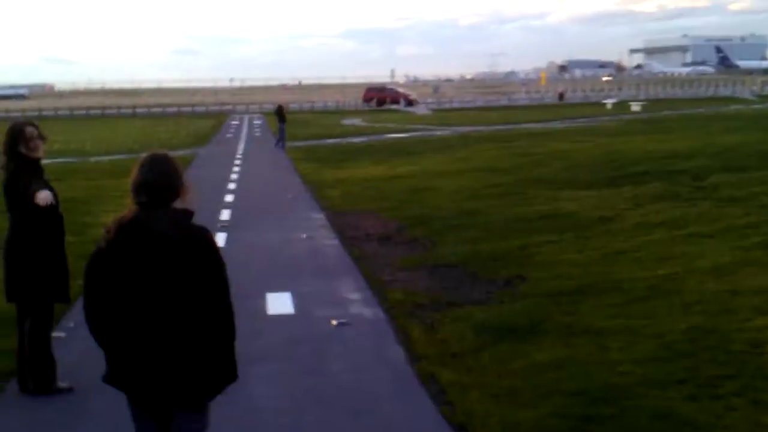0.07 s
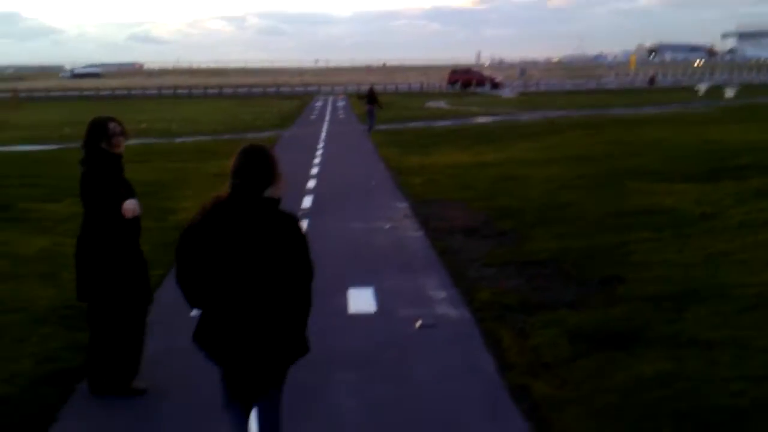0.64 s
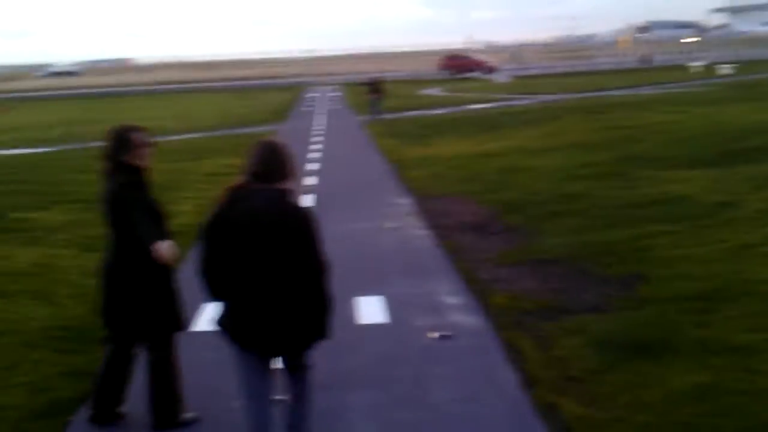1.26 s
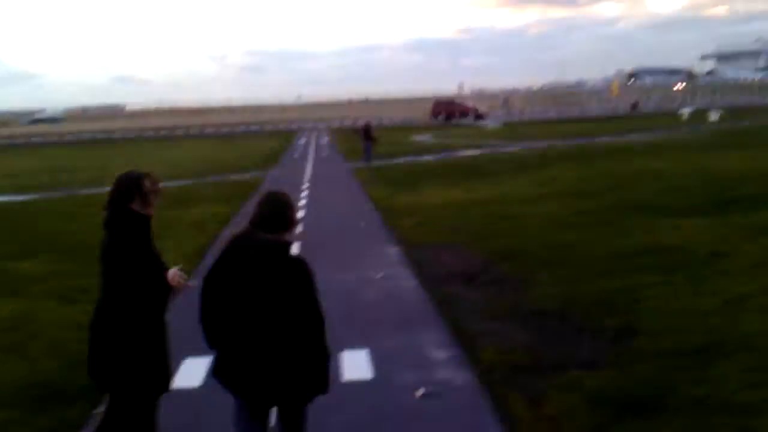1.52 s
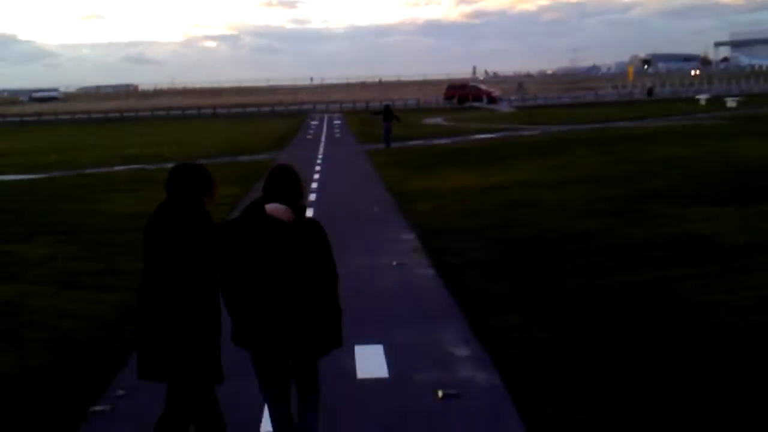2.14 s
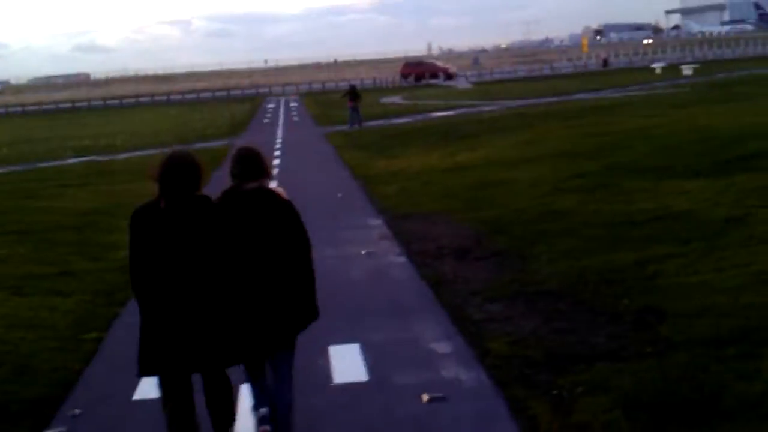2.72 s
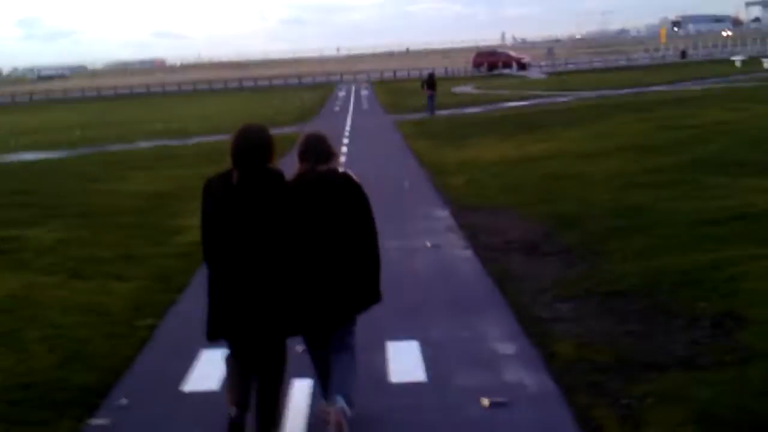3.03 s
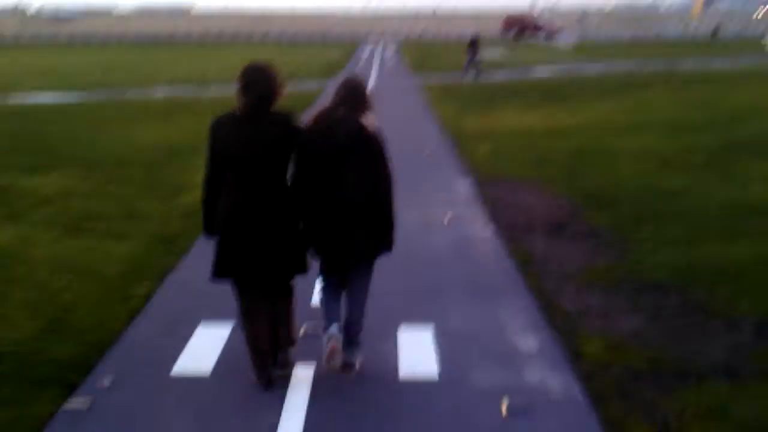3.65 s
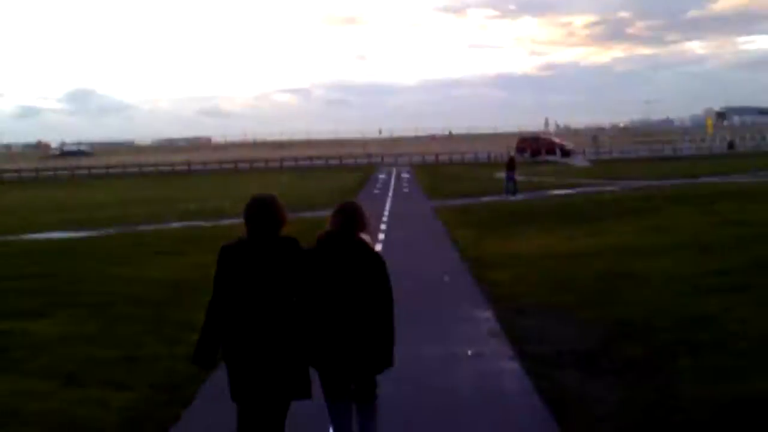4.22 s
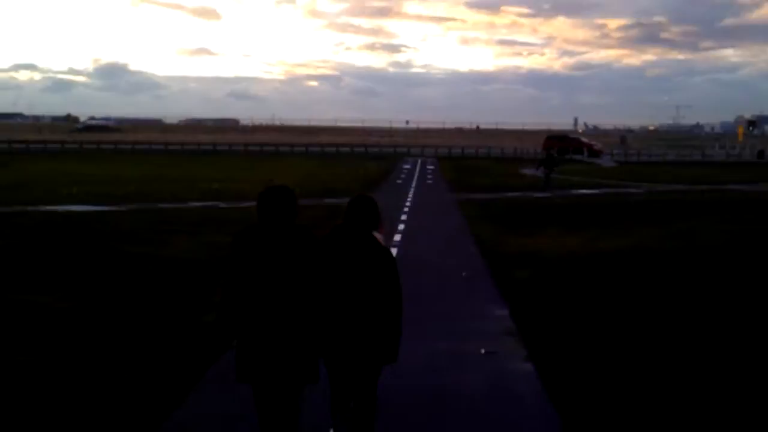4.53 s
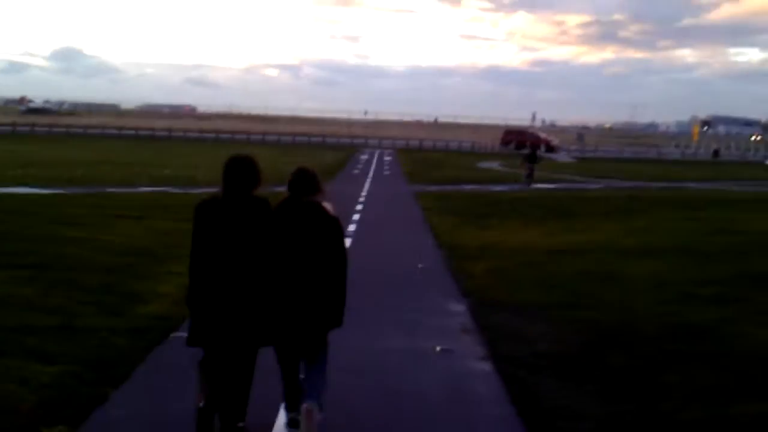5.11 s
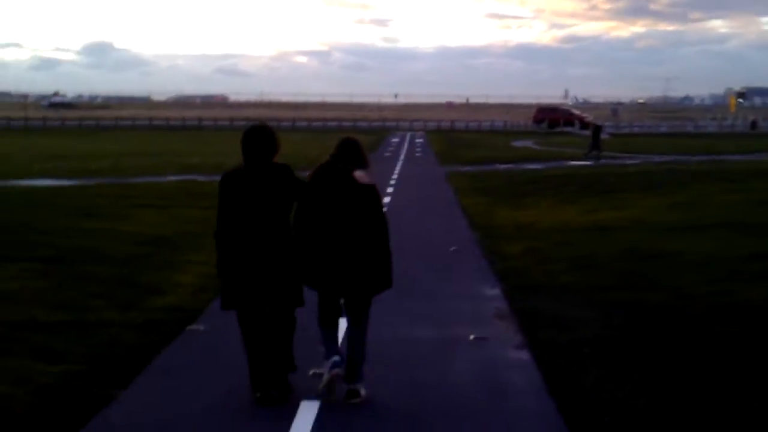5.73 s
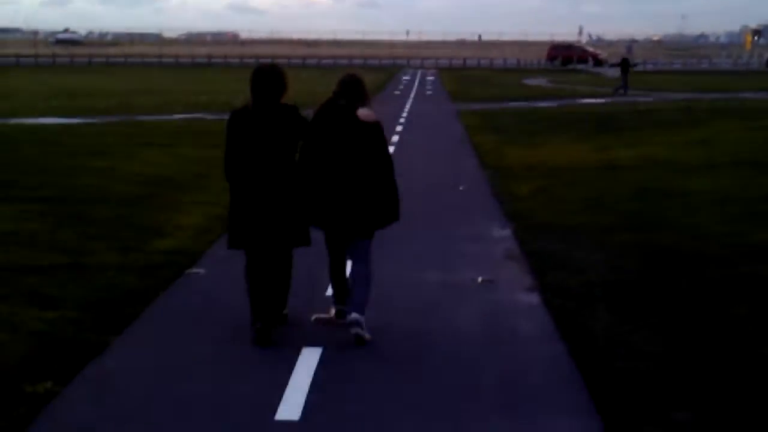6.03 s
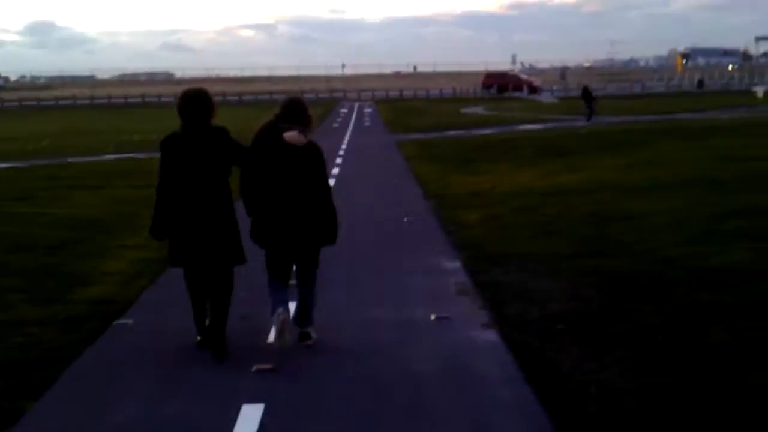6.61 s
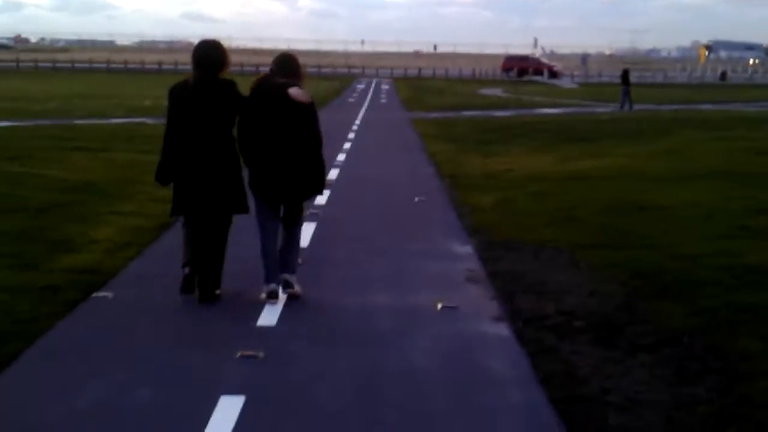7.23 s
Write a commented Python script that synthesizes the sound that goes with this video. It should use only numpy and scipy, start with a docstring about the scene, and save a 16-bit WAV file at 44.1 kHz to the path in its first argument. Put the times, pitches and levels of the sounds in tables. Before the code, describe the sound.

Outdoors near an airfield, a propeller plane flies over with a low drone and a rushing roar. After a brief high whine the sound swells, then slowly recedes, the drone falling in pitch and wavering while the roar keeps returning in short surges. Walkers' shoes tick and scuff faintly on a paved path. A small microphone with dull treble adds a soft hiss over the low outdoor background.

```python
"""A turboprop airliner passes overhead beside an airfield. Its propeller blades beat the air into a deep
drone that sinks in pitch, its engine roar surges with the turbulent air, and its turbine whines briefly.
Drone and roar also bounce off the ground; this echo cancels some pitches and boosts others, in a slow
sweep. Below lie outdoor noise, microphone hiss and the faint ticks, knocks and scuffs of people walking."""
import sys
import numpy as np
from scipy import signal
from scipy.io import wavfile

SR = 44100
rng = np.random.default_rng(int(sys.argv[2]) if len(sys.argv) > 2 else 0)


def generate_wav(signal):
    """Clip the signal to [-1, 1] and save it as 16-bit WAV at the path in sys.argv[1]."""
    frames = np.transpose(np.atleast_2d(signal))
    scaled = np.clip(frames, -1, 1) * 32767
    pcm = np.round(scaled).astype(np.int16)
    wavfile.write(sys.argv[1], SR, pcm)


N = 329074

# The background, from low outdoor noise up to microphone hiss: pitch_hz, relative_db
BACKGROUND_SPECTRUM = [(25, -8), (45, 1.5), (150, 2), (300, .5), (450, -7), (700, -1.5), (1000, -3.5),
                       (1550, -2.5), (1950, -5), (2450, -11.5), (3080, -18.5), (3880, -18.5), (4900, -27.5),
                       (6150, -31)]
# Shoes and clothes tick: start_s, level_db
SHOE_TICKS = [(0.1966, -43), (0.409, -33), (0.894, -32), (0.9247, -32), (0.9773, -34), (1.3803, -35.5),
              (1.84, -33.5), (2.9, -33), (2.9116, -34), (4.0795, -40), (4.252, -37), (4.4403, -36),
              (4.5886, -41), (5.4205, -31.5), (6.4259, -38), (6.47, -40), (7.124, -36), (7.319, -33)]
# Heels land on asphalt with a dull knock: start_s, level_db
HEEL_KNOCKS = [(0.884, -22.5), (2.911, -27)]
# Soles and coats rub: middle_s, level_db, half_length_s
SOLE_SCUFFS = [(.22, -56, .09), (.447, -49, .07), (.59, -49, .04), (.95, -50, .06), (2.035, -60, 0.0295),
               (2.39, -57, .05), (2.917, -45, 0.016), (2.968, -45, 0.032), (5.46, -56, .05),
               (6.41, -53.5, 0.078), (6.93, -53, .025)]

# Turbulent air carries the engine noise over in surges: peak_s, boost_db, rise_s, pitch_hz, spread_octaves
AIR_SURGES = [(0.26, 5.5, 0.052, 1794, 2.3), (0.58, 7.5, 0.059, 850, 1), (1.057, 4.5, 0.13, 1297, 1.4),
              (1.316, 8.5, 0.067, 2970, 1.4), (1.675, 6, 0.1, 2380, 1.8), (2.026, 4, 0.03, 3020, 0.43),
              (2.204, 4, 0.065, 1410, 1.4), (2.45, 6, 0.042, 3000, 1.1), (3.026, 10.5, .115, 1055, 1.7),
              (3.97, 8, 0.048, 1655, 1.2), (4.133, 4, 0.061, 1625, 1.2), (4.705, 7, 0.095, 1707, 1.17),
              (4.69, 5, 0.034, 700.3, 0.6), (5.46, 9.5, 0.09, 1296, 1.3), (6.417, 10, 0.1, 916, 1.05),
              (6.469, 10, 0.13, 181, 0.85), (6.915, 10.5, 0.12, 750, 0.66), (7.404, 12, 0.11, 606, 1.1)]
# The ground echo comes latest with the aircraft overhead: time_s, delay_ms
ECHO_DELAY = [(0, 7.27), (1, 8.32), (2, 8.62), (3, 8.6), (3.5, 8.38), (4.65, 8.42), (5, 7.98), (6, 7.25),
              (6.6, 6.84), (7.46, 6.08)]
# The turbine whine beams forward and arrives in swells: middle_s, relative_db, half_length_s
TURBINE_SWELLS = [(.95, -45.5, 0.11), (1.09, -38, 0.076), (1.33, -32.5, .05), (1.56, -42.5, .08),
                  (1.685, -36.5, 0.045), (1.82, -41, .09)]
# How strong the roar is from low to high: pitch_hz, relative_db
ROAR_SPECTRUM = [(25, -14.5), (40, -14), (70, -2.5), (130, -4.5), (220, -6), (370, -1.5), (620, -2),
                 (1000, -6), (1900, -11), (2450, -14.5), (3080, -19), (3880, -24), (4900, -34),
                 (6150, -54.5)]
# The roar's low part, the exhaust rumble: time_s, relative_db
ROAR_LOW = [(0, 2), (2.1, 4.5), (2.9, 1.5), (3.5, -2), (5.1, 0.5), (5.7, -2.5), (6.15, -8), (6.7, -2.5),
            (7.46, -5.5)]
# Its middle part, loudest overhead: time_s, relative_db
ROAR_MIDDLE = [(0, -3.5), (1.45, -1), (1.95, 8.5), (2.7, 2.5), (3.45, -1.5), (3.7, 5), (4.4, -1.5),
               (4.95, 2), (6.1, -3.5), (7.2, -16)]
# Its high part, a hiss that beams forward: time_s, relative_db
ROAR_HIGH = [(0, -1), (1.5, -3.5), (2.38, -4), (2.65, -7), (3.6, -6.5), (4.2, -4), (5.8, -3.5),
             (7.46, -4.5)]

# The rate of blade pulses, sinking as the aircraft flies by: time_s, pitch_hz
BLADE_PITCH = [(0, 105.3), (1, 100.2), (2, 96.7), (3.2, 92.8), (4, 90.66), (4.65, 88.85), (5, 88.2),
               (6, 86.43), (6.6, 85.5), (7.46, 84.6)]
# The drone's lowest tone, before waver and throb: time_s, level_db
DRONE_LEVEL = [(0, -15), (.33, -17), (.62, -16), (1.35, -18.5), (1.92, -14.5), (2.3, -18), (2.85, -16),
               (3.2, -19.5), (3.85, -17.5), (4.55, -18.5), (4.8, -21), (5.25, -18), (5.72, -30.5),
               (5.92, -25), (6.5, -29.5), (7.46, -40.5)]
# That tone wavers more as the aircraft moves away: time_s, waver_db
DRONE_UNSTEADINESS = [(0, 0.1), (5.1, .7), (5.8, 1.9), (7.46, 1.5)]
# Overtones (higher tones of the drone) that beam sideways, loudest overhead: time_s, level_db
SIDE_BEAM = [(0, -30), (.25, -34), (.5, -24), (.7, -30), (.86, -24.5), (1.35, -30), (1.9, -23.5),
             (2.45, -29), (2.9, -25.5), (3.35, -32), (3.9, -33), (4.4, -42.5), (5.2, -35.5), (6.15, -43.5),
             (6.47, -30.5), (6.7, -40), (7.46, -42)]
# The tones in that beam: pitch_multiple, offset_db
SIDE_OVERTONES = [(2, 1.5), (5, -18), (6, -19), (7, -21.5)]
# Overtones that beam backwards, loudest just after the aircraft has passed: time_s, level_db
REAR_BEAM = [(0, -36.5), (1, -36), (1.45, -44), (2, -37), (2.7, -44.5), (3.2, -35), (4.05, -35.5),
             (4.42, -44), (4.62, -35.5), (4.8, -41.5), (5.5, -36), (6.1, -45.5), (7.46, -44)]
# The tones in that beam: pitch_multiple, offset_db
REAR_OVERTONES = [(3, 0.024), (4, -1.2)]


def from_db(db):
    """Turn decibels into a number to multiply a sound by."""
    return 10 ** (np.asarray(db) / 20)


def rms_one(x):
    """Scale a signal so that its average strength (rms) is 1."""
    return x / np.sqrt(np.mean(x ** 2) + 1e-20)


def curve(rows):
    """Join (time_s, value) points with straight lines, giving a value for every sample."""
    times_s, values = np.transpose(rows)
    return np.interp(np.arange(N) / SR, times_s, values)


def drift(rate_hz):
    """A smooth random wobble of about size 1; a higher rate makes it quicker."""
    step, warm_up = 40, 2000   # one point every 40 samples; the first 2000 points are dropped
    memory = np.exp(-2 * np.pi * step * rate_hz / SR)
    noise = rng.standard_normal(N // step + warm_up + 2)
    smooth = signal.lfilter([1], [1, -2 * memory, memory * memory], noise)[warm_up:]
    return np.interp(np.arange(N) / step, np.arange(len(smooth)), rms_one(smooth))


def swells(rows):
    """A loudness shape with one smooth hump for each (middle_s, level_db, half_length_s)."""
    t = np.arange(N) / SR
    return sum(from_db(db) * np.exp(-np.minimum(((t - s) / half) ** 2, 20)) for s, db, half in rows)


def band_noise(low_hz, high_hz, order):
    """Noise between two pitches; a higher order gives sharper edges."""
    band = signal.butter(order, [low_hz, high_hz], "band", fs=SR, output="sos")
    return signal.sosfilt(band, rng.standard_normal(N))


def noise_bands(spectrum):
    """Noise in third-octave slices, as (centre_hz, band) pairs; together they have strength 1."""
    edges = np.geomspace(22, 6900, 26)
    centres = np.sqrt(edges[:-1] * edges[1:])
    white = rng.standard_normal((2, N))   # neighbouring bands get unrelated noise
    filters = [signal.butter(3, pair, "band", fs=SR, output="sos") for pair in zip(edges, edges[1:])]
    bands = np.array([signal.sosfilt(sos, white[k % 2]) for k, sos in enumerate(filters)])
    pitch_hz, relative_db = np.transpose(spectrum)
    bands *= from_db(np.interp(np.log(centres), np.log(pitch_hz), relative_db))[:, None]
    return zip(centres, bands / np.std(bands.sum(axis=0)))


def outdoor_noise_and_hiss(level_db, flutter_db, steady_above_hz):
    """Wavering low outdoor noise, with a steadier microphone hiss above it that sinks a little."""
    sink_db = 0.05 * (np.arange(N) - N / 2) / SR
    out = np.zeros(N)
    for hz, band in noise_bands(BACKGROUND_SPECTRUM):
        restless = 1 / (1 + (hz / steady_above_hz) ** 2)
        out += band * from_db(restless * flutter_db * drift(4.9) - (1 - restless) * sink_db)
    return from_db(level_db) * out


def taps(rows, fade_s, low_hz, high_hz, order):
    """Small hits of shoes and clothes: noise that starts at once and falls 60 dB in fade_s."""
    tail = from_db(-60 * np.arange(SR // 4) / SR / fade_s)
    loudness = np.zeros(N + SR)
    for start_s, level_db in rows:
        start = round(start_s * SR)
        loudness[start:start + len(tail)] += from_db(level_db) * tail
    return loudness[:N] * rms_one(band_noise(low_hz, high_hz, order))


def scuffs(grain_db):
    """Soles and cloth rub, making short swells of grainy hiss."""
    grit = band_noise(2000, 8000, order=1) * from_db(grain_db * drift(120))
    return swells(SOLE_SCUFFS) * rms_one(grit)


def air_surges():
    """Turbulent air lifts the sound for a moment: (pitch_hz, spread_octaves, boost_db over time) each."""
    t = np.arange(N) / SR
    surges = []
    for peak_s, boost_db, rise_s, pitch_hz, octaves in AIR_SURGES:
        fall_s = 1.16 * rise_s
        from_peak = np.abs(t - peak_s) / np.where(t < peak_s, rise_s, fall_s)
        hump = np.exp(-np.minimum(from_peak, 3) ** 2.1)   # a power above 2 flattens the top
        surges.append((pitch_hz, octaves, boost_db * hump))
    return surges


def surge_db(surges, hz):
    """How far the surges lift one pitch: most at their centre, less with every octave away."""
    return sum(boost * np.exp(-.5 * (np.log2(hz / centre) / octaves) ** 2)
               for centre, octaves, boost in surges)


def scattered(phase, width_hz):
    """Turbulence smears a tone into a narrow band of noise around its pitch."""
    return drift(width_hz) * np.sin(phase) + drift(width_hz) * np.cos(phase)


def add_ground_echo(direct, strength, dull_hz):
    """The direct sound plus its slightly later bounce off the ground, which is duller in the treble."""
    dulled = signal.sosfilt(signal.butter(1, dull_hz, fs=SR, output="sos"), direct)
    n = np.arange(N)
    delay_samples = curve(ECHO_DELAY) * SR / 1000
    return direct + strength * np.interp(n - delay_samples, n, dulled, left=0)


def compressor_rasp(surges, low_hz, high_hz, nearest_s, fade_db_per_s):
    """Rough noise from the engine's compressor, which only carries while the aircraft is near."""
    rough = band_noise(low_hz, high_hz, order=2) * from_db(2.5 * drift(40))
    level_db = -43 - fade_db_per_s * np.abs(np.arange(N) / SR - nearest_s)
    return from_db(level_db + surge_db(surges, np.sqrt(low_hz * high_hz))) * rms_one(rough)


def turbine_whine(pitch_hz, wobble_hz, tone_gain_db, smear_gain_db):
    """The compressor's high tone; turbulence scatters part of it into noise."""
    phase = 2 * np.pi * np.cumsum(pitch_hz + wobble_hz * drift(40)) / SR
    tone = np.sqrt(2) * from_db(2.0 * drift(30)) * np.sin(phase)
    smear = scattered(phase, width_hz=230)
    return swells(TURBINE_SWELLS) * (from_db(tone_gain_db) * tone + from_db(smear_gain_db) * smear)


def engine_roar(surges, gain_db, flutter_db):
    """Exhaust and air rushing over the aircraft: noise that swells with the pass and the surges."""
    levels_db = np.array([curve(ROAR_LOW), curve(ROAR_MIDDLE), curve(ROAR_HIGH)])
    parts_hz = [252, 600, 2900]   # where each of the three levels holds; between them they blend
    out = np.zeros(N)
    for hz, band in noise_bands(ROAR_SPECTRUM):
        shares = np.array([np.interp(np.log(hz), np.log(parts_hz), part) for part in np.eye(3)])
        out += from_db(shares @ levels_db + surge_db(surges, hz) + flutter_db * drift(14)) * band
    return from_db(gain_db) * out


def throb_db(start_s, grow_s, crest_s, period_s, swing_db):
    """The slow beat of the far-off drone, which dips further than it rises."""
    t = np.arange(N) / SR
    grown = np.clip((t - start_s) / grow_s, 0, 1)
    return swing_db * grown * (np.cos(2 * np.pi * (t - crest_s) / period_s) - .5)


def propeller(blade_hz, smear_hz):
    """Each passing blade sends a pulse of air. The lowest tone stays clean; distance blurs the rest."""
    phase = 2 * np.pi * np.cumsum(blade_hz) / SR
    level_db = curve(DRONE_LEVEL) + curve(DRONE_UNSTEADINESS) * drift(6.8)
    level_db += throb_db(start_s=6.53, grow_s=0.37, crest_s=6.79, period_s=0.53, swing_db=26)
    out = np.sqrt(2) * from_db(level_db) * np.sin(phase)
    blur = 0.014 + 0.041 * np.arange(N) / SR   # grows as the aircraft moves away
    for beam, overtones in ((SIDE_BEAM, SIDE_OVERTONES), (REAR_BEAM, REAR_OVERTONES)):
        for multiple, offset_db in overtones:
            noise_share = np.clip(blur * multiple / 2, 0, 1)   # high overtones turn to noise first
            smear = np.sqrt(noise_share) * scattered(multiple * phase, multiple * smear_hz)
            tone = np.sqrt(2 * (1 - noise_share)) * np.sin(multiple * phase + rng.uniform(0, 2 * np.pi))
            out += from_db(curve(beam) + offset_db) * (tone + smear)
    return out


def scene():
    """The aircraft heard over the ground, with the background and the walkers, in one channel."""
    blade_hz = curve(BLADE_PITCH)
    surges = air_surges()
    drone = propeller(blade_hz, smear_hz=6.7)
    roar = engine_roar(surges, gain_db=-27.5, flutter_db=1.5)
    aircraft = add_ground_echo(drone + roar, strength=0.55, dull_hz=2320)
    # whine and drone sink in pitch together as the aircraft passes (the Doppler effect)
    whine = turbine_whine(23.7 * blade_hz, wobble_hz=8.3, tone_gain_db=1.5, smear_gain_db=2.5)
    rasp = compressor_rasp(surges, low_hz=2420, high_hz=3470, nearest_s=2.05, fade_db_per_s=9.5)
    ticks = taps(SHOE_TICKS, fade_s=0.053, low_hz=800, high_hz=3380, order=1)
    heels = taps(HEEL_KNOCKS, fade_s=0.054, low_hz=650, high_hz=1500, order=2)
    walkers = ticks + heels + scuffs(grain_db=2.0)
    background = outdoor_noise_and_hiss(level_db=-29.5, flutter_db=2.15, steady_above_hz=2200)
    return (background + walkers + aircraft + whine + rasp)[None]


def record(dry):
    """A small microphone that loses the highest treble."""
    cutoff_hz = 7100
    return signal.sosfilt(signal.ellip(10, .1, 80, cutoff_hz, fs=SR, output="sos"), dry)


dry = scene()
out = record(dry)
generate_wav(out)
```